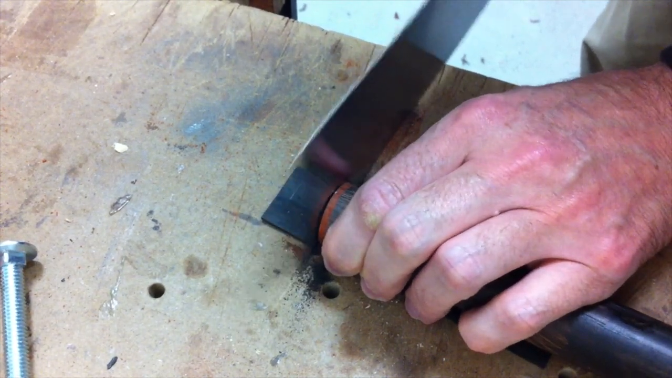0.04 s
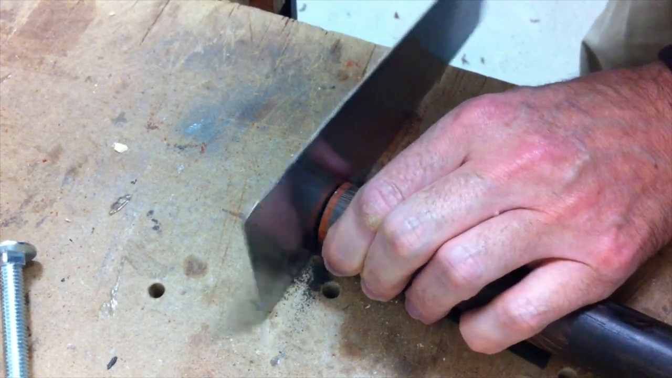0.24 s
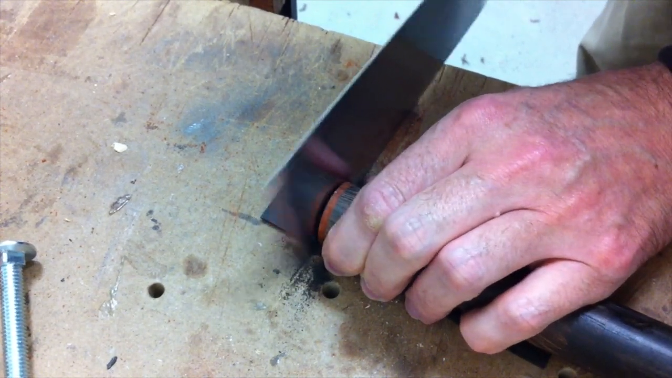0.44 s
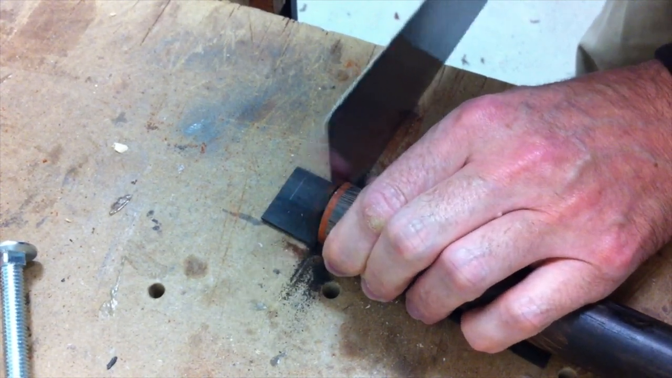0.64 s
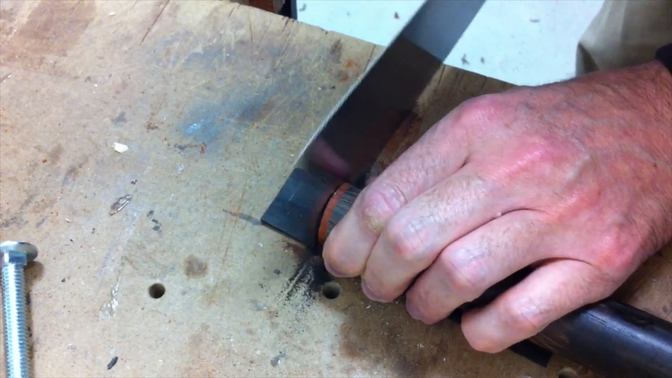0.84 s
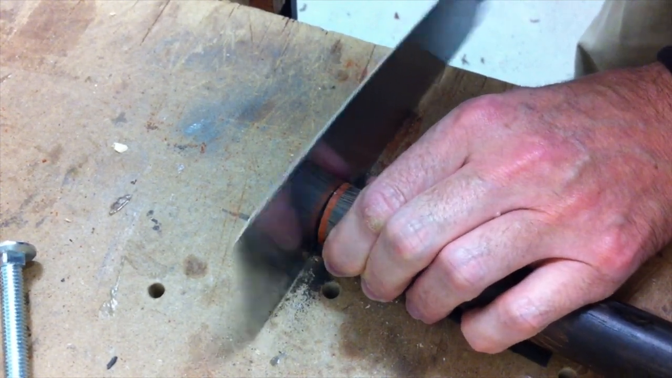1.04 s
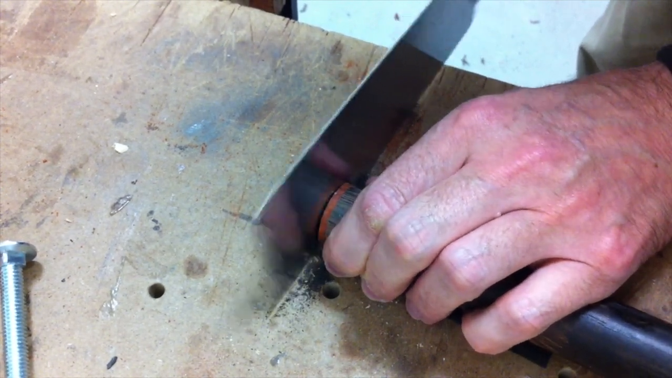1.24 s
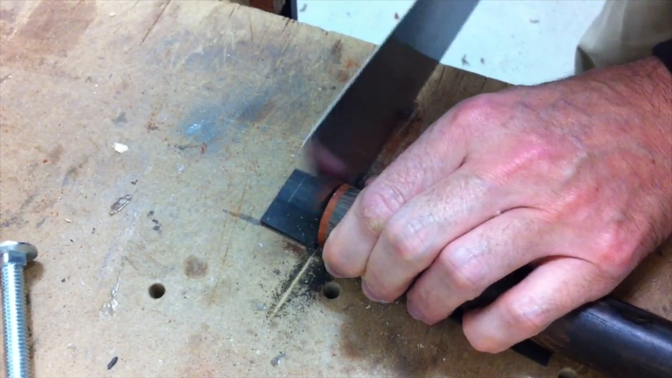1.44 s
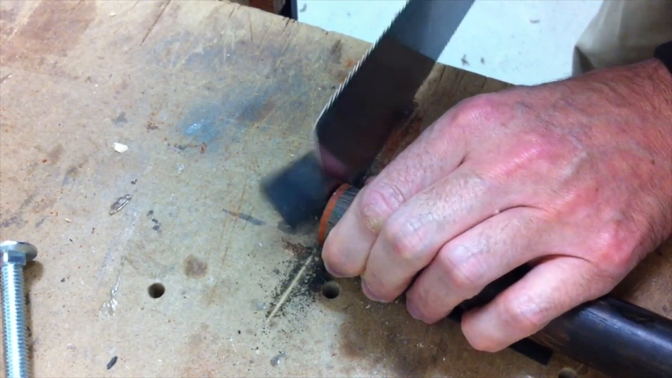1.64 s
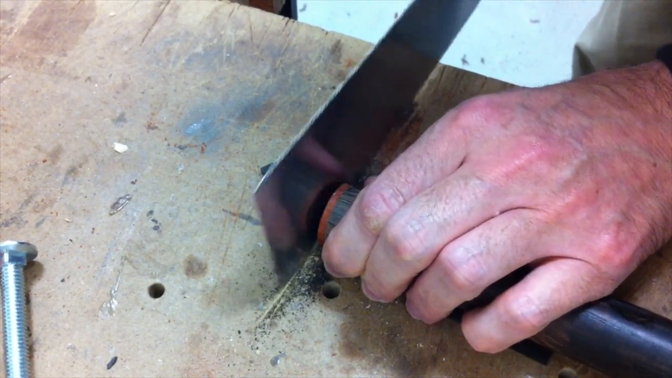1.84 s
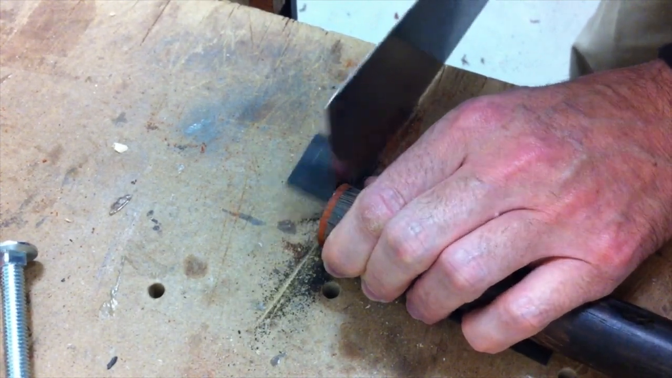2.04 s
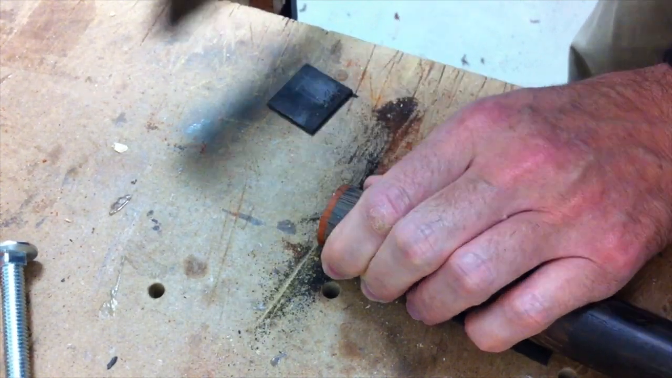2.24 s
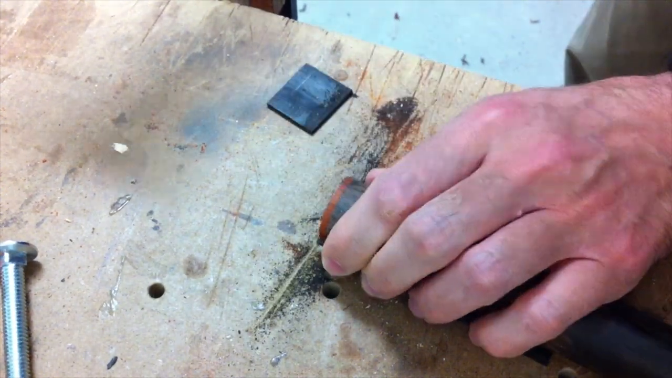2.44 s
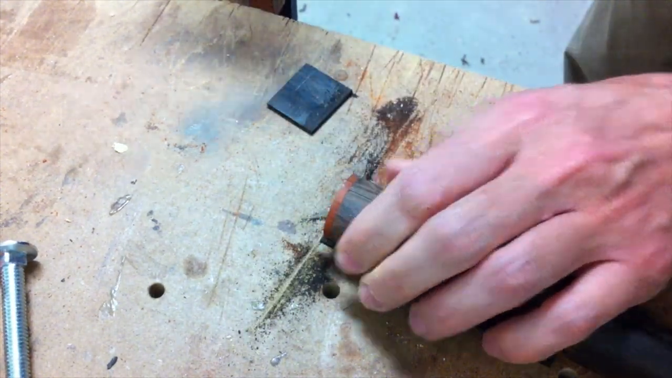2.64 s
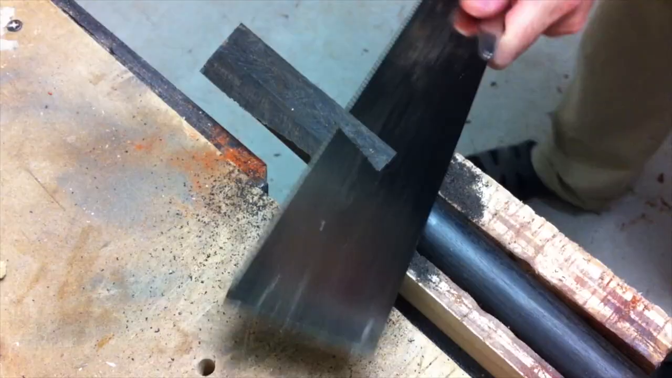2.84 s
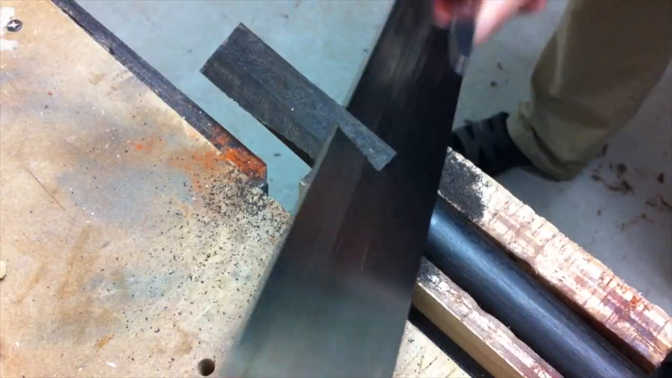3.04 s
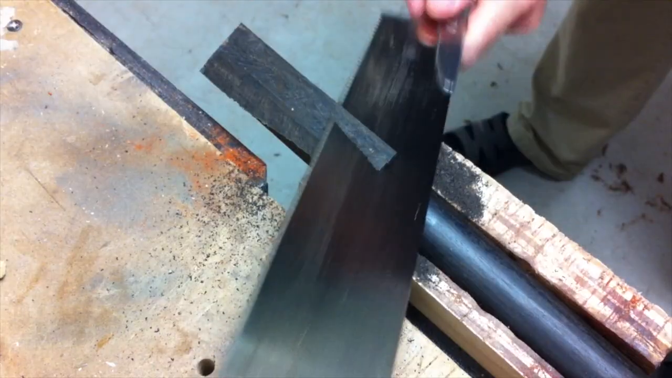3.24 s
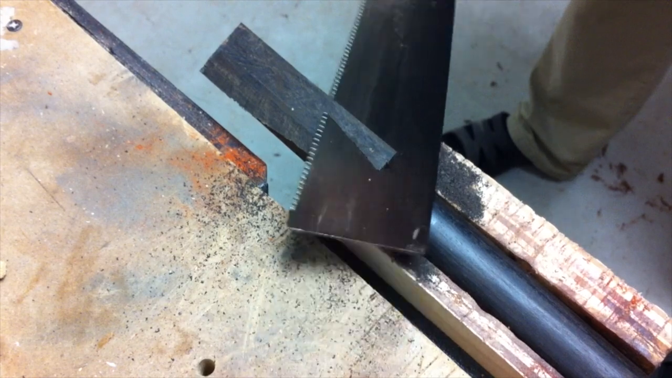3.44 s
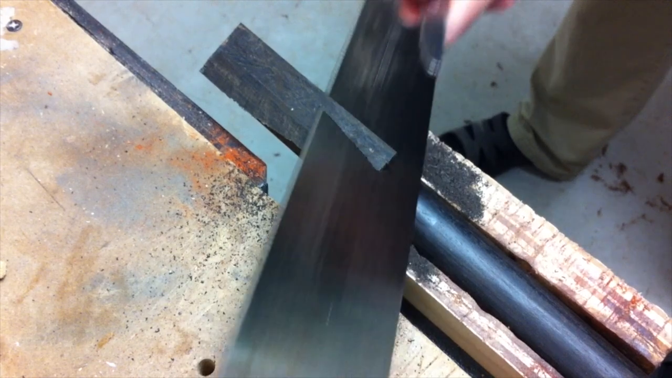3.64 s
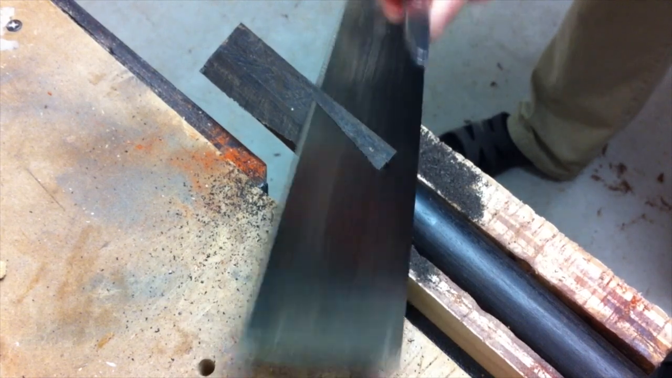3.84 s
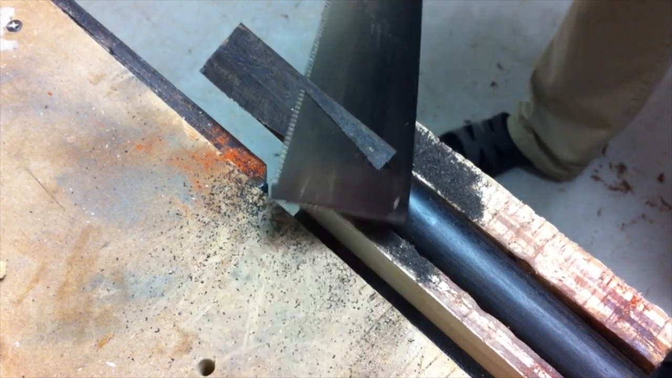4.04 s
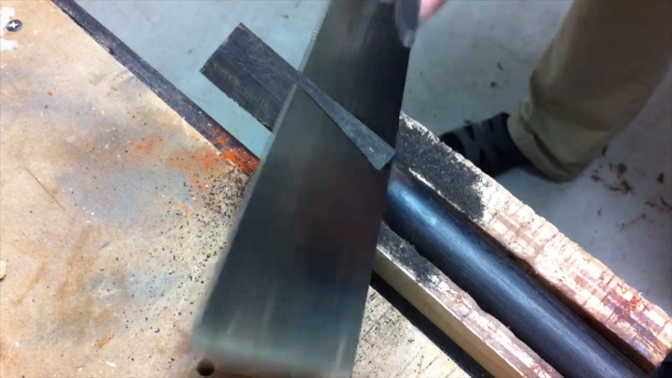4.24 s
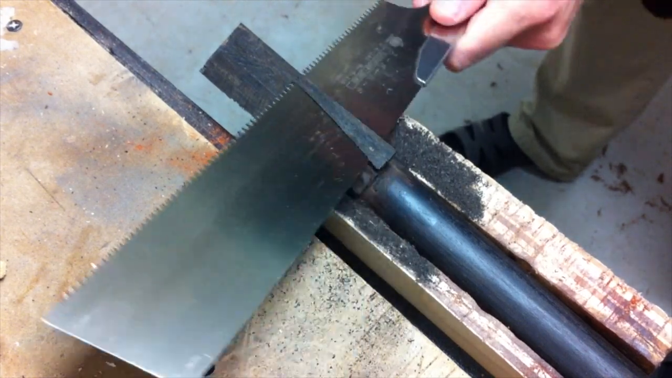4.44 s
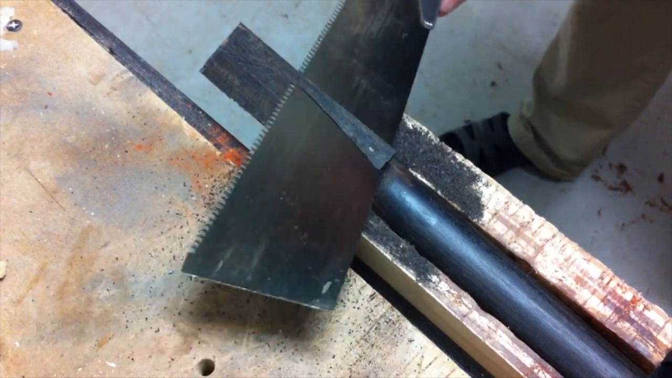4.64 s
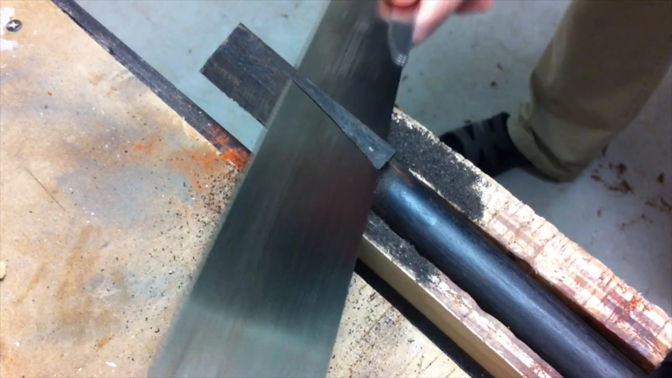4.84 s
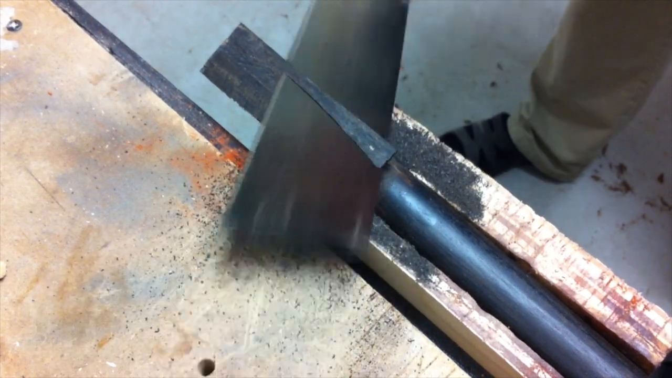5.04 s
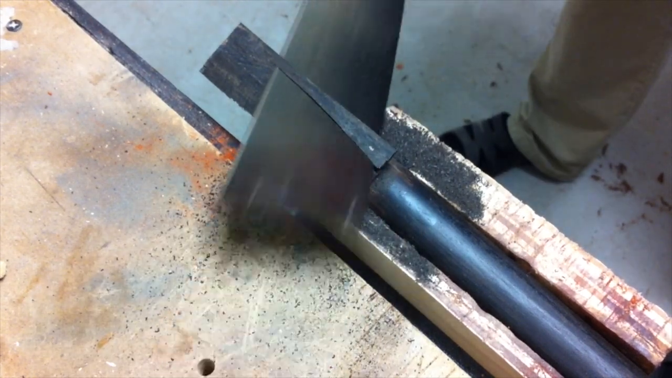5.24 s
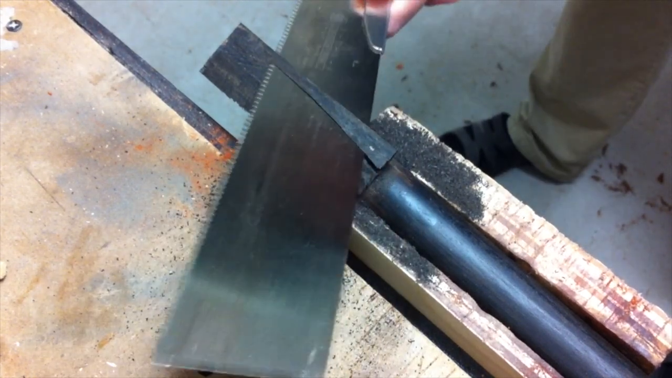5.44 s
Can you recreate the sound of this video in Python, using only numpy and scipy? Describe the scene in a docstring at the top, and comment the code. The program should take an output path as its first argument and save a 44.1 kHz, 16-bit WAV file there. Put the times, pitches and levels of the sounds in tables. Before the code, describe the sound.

Close-miked hand sawing on wood, dry with a little room sound. Rapid to-and-fro rasps, about six full cycles a second, with woody rattle and steel hiss, end in a light scrape and high faint ring. A solid knock with tiny bounces follows. Then a second run of sawing begins, with the blade ringing and juddering more; it breaks off for a moment, teeth click, and strokes resume to the end.

```python
"""Quick, rasping strokes of a thin hand saw in a wooden cue held on a bench, in a small workshop.
The saw is drawn off with a faint singing of the blade, and something hard knocks on the bench top.
Then the cue is clamped in a vise and the blade rings more; sawing pauses, teeth tick back in, it goes on.
Tooth clicks and random grains drive resonances of cue and steel, with a hiss of tearing fibres on top.
A short reverberation and a faint steady background surround it all."""
import sys
import numpy as np
from scipy import signal
from scipy.fft import rfft, irfft
from scipy.io import wavfile
from scipy.ndimage import uniform_filter1d

SR = 44100
rng = np.random.default_rng(int(sys.argv[2]) if len(sys.argv) > 2 else 0)


def master(y):
    """Save y as 16-bit WAV."""
    cut = np.clip(np.atleast_2d(y).T, -1, 1)
    pcm = np.round(cut * 32767)  # scale
    wavfile.write(sys.argv[1], SR, pcm.astype(np.int16))


N = 242550

# All levels in the tables are relative.
# strokes to and fro on the bench:
# (start [s], cut length [s], return length [s], cut force [dB], return force [dB])
BENCH_STROKES = [(-.04, 0.086, .073, -3, -3.5), (.118, 0.086, 0.075, -2, -1), (.278, .081, 0.078, -1.5, -1),
                 (.431, 0.085, 0.084, -0.5, -1.5), (.6, 0.081, 0.082, -1.5, -0.5),
                 (.761, 0.088, 0.079, -0.5, -1), (.925, 0.078, 0.089, 1.5, 2.5), (1.095, .076, 0.082, 2, 2),
                 (1.255, .076, .082, 2, 1.5), (1.413, 0.083, .08, 2, 1), (1.577, 0.087, 0.093, 1, 3),
                 (1.756, 0.069, .06, 4.5, -3)]
# strokes to and fro in the vise:
# (start [s], cut length [s], return length [s], cut force [dB], return force [dB])
VISE_STROKES = [(2.911, .07, .046, -11, -14), (3.012, .08, .079, -2, -1.5), (3.172, .077, 0.067, -2, -2),
                (3.323, 0.074, 0.072, -2, -2), (3.468, 0.066, .08, -0.5, -2),
                (3.614, .076, 0.065, -0.5, 1.5), (3.757, 0.078, .08, 1, 1.5),
                (3.912, 0.076, 0.073, 1, -0.5), (4.064, .064, 0.081, 0, 0), (4.213, .065, .093, 2.5, 1.5),
                (4.655, .07, .086, -6.5, -10), (4.815, 0.066, 0.077, -2, 0.5),
                (4.957, 0.069, 0.067, 1, 2.5), (5.099, 0.071, 0.066, 2, 1.5), (5.241, 0.076, 0.075, 2, 3.5),
                (5.393, 0.07, .062, 3.5, 4.5)]
# a tooth catches and jolts the hand-held cue: (time [s], level [dB])
TOOTH_CATCHES = [(.1622, -12), (.3212, -12.5), (.477, -29), (.7833, -7), (.965, -10), (.983, -7.5),
                 (1.452, -9.5), (1.7705, -14), (1.7955, -13)]
# resonances of the cue held on the bench: (frequency [Hz], width [Hz], level [dB])
CUE_ON_BENCH_MODES = [(322.6, 36, -8), (480, 28, -7), (584, 31, -4.5), (712, 73, -6.5), (942, 73, 1.5),
                      (1185, 105, 2.5), (1320, 160, -1), (1528, 122, -0.5), (1820, 47, -3)]
# resonances of the cue clamped in the vise: (frequency [Hz], width [Hz], level [dB])
CUE_IN_VISE_MODES = [(502.5, 28, -8.5), (613, 70, -6.5), (717, 103, -5), (846, 39, -0.5), (1110, 70, -9.5),
                     (1448, 26, -5.5), (1430, 170, -12.5), (1912, 136, -11.5)]
# resonances of the blade at the bench: (frequency [Hz], width [Hz], level [dB])
BLADE_ON_BENCH_MODES = [(953, 36, -23), (2140, 173, 6), (2365, 150, 5.5), (2543, 63, 4), (2810, 310, -10),
                        (3440, 300, -9.5), (4630, 270, -8), (7500, 130, -8.5), (10240, 220, -14)]
# resonances of the blade at the vise: (frequency [Hz], width [Hz], level [dB])
BLADE_IN_VISE_MODES = [(944, 47.7, 2.5), (2182, 103, -5.5), (2340, 70, -7), (2615, 154, -14),
                       (2920, 490, -22), (3320, 32, -9), (3516, 88, -11), (3605, 6.7, -14)]
# hiss of tearing fibres on the bench: (frequency [Hz], spectrum level [dB])
BENCH_HISS_SPECTRUM = [(150, -18), (300, -6), (900, 5.5), (2400, 8), (3000, 1.5), (4000, -4.5),
                       (4700, -3.5), (5400, -7), (6000, -2), (7300, -7.5), (8100, 0), (9300, -4),
                       (10300, -0.5), (11500, -3), (15800, -6)]
# hiss of tearing fibres in the vise: (frequency [Hz], spectrum level [dB])
VISE_HISS_SPECTRUM = [(60, -13), (200, -16.5), (330, -8.5), (600, 14), (1500, 0), (3000, 6), (4200, -1.5),
                      (5400, -2.5), (6200, 5.5), (7600, 0), (9500, 0), (10600, -8), (15800, -10.5)]
# the deepening kerf grips the blade and makes it ring: (frequency [Hz], width [Hz], level [dB])
KERF_MODES = [(994, 46, 6.5), (3430, 220, 6)]
# the blade is drawn slowly off the cue: (time [s], scrape level [dB])
DRAW_OUT_SCRAPE = [(1.88, -49.5), (1.952, -53.5), (2.016, -46.5), (2.1, -56.5), (2.14, -45.5), (2.162, -49),
                   (2.192, -59.5), (2.262, -63.5), (2.27, -78)]
# the blade binds twice in each clamped cut, on biting and then at its own pitch:
# (share of the cut [0-1], slip rate [1/s], relative scatter of that rate [0-1], level [dB])
BLADE_BINDS = [(.26, 713, 0.04, -36), (0.558, 957, 0.04, -36.5)]
# the teeth pluck the blade on the way out: (time [s], level [dB])
BLADE_PLUCKS = [(2.121, -29), (2.225, -36), (2.26, -49)]
# the free blade sings as it leaves the cut: (frequency [Hz], width [Hz], level [dB])
FREE_BLADE_MODES = [(3900, 5, -4), (6400, 2.6, -2), (7300, 5.7, -2), (9200, 8.8, -7), (12100, 12, -1),
                    (13400, 34, -3)]
# bare teeth touch the work: (time [s], level [dB])
TOOTH_TICKS = [(4.634, -24), (4.6495, -10), (4.651, -15.5)]
# ring of the teeth: (frequency [Hz], width [Hz], level [dB])
TEETH_MODES = [(1507, 1330, -8), (2950, 430, -8), (4203, 89, 10), (5410, 90, 3), (7600, 200, -20),
               (10570, 1400, -9.5), (12900, 180, -1), (15030, 3300, -10.5)]
# hard knock on the bench top and its small bounces: (time [s], level [dB])
BENCH_KNOCKS = [(2.5524, 1), (2.5546, -9), (2.595, -17.5), (2.615, -16.5), (2.719, -30)]
# resonances of the bench top: (frequency [Hz], width [Hz], level [dB])
BENCH_TOP_MODES = [(313, 80, 3.5), (436, 130, 4.5), (635, 180, 2.5), (746, 69, 1.5), (1003, 180, -2.5),
                   (1190, 223, 2.5), (1780, 550, -9), (2370, 370, -3), (2940, 470, -8.5), (3660, 610, -8),
                   (4600, 560, -13), (5730, 770, -10.5), (7330, 530, -9), (10200, 1150, -19),
                   (13400, 510, -18)]
# the heavy bench frame thuds under a knock: (frequency [Hz], width [Hz], level [dB])
BENCH_FRAME_MODES = [(65, 63, -1), (110, 60, -2)]
# the workshop's reverberation: (frequency [Hz], time to fall by 60 dB [s])
ROOM_DECAY = [(200, 0.3), (1000, 0.3), (3000, 0.43), (8000, 0.29), (16000, 0.39)]
# the workshop's steady background: (frequency [Hz], spectrum level [dB])
FLOOR_SPECTRUM = [(18, -66), (30, -24), (130, -35), (161, -12.5), (264, -15), (344, -3.5), (372, -5),
                  (402, -2.5), (1060, -12.5), (1660, -13), (2150, -19), (3940, -19.5), (15800, -27)]

# the cut bites into the wood, the return skates:
# (moment of top speed as a share of the stroke, wood [dB], blade [dB], hiss [dB])
BENCH_CUT, BENCH_RETURN = (.64, -39.5, -43, -47.5), (.48, -49.5, -45, -43.5)
VISE_CUT, VISE_RETURN = (.5, -39, -37, -44.5), (.35, -46, -38, -52)
WOOD_PER_FORCE, BLADE_PER_FORCE, HISS_PER_FORCE = 1.36, 1, .78  # dB for each dB of force
TURN_S = .004  # a stroke runs this far into its neighbours
DRAW_OUT_MIX_DB = (-.87, -6.5, -11.5)  # wood, blade, hiss
DRAW_OUT_FADE_S = .0086
KERF_DB, KERF_DB_PER_S, KERF_FULL_S = -6, 16, 1  # level at full depth, growth until then, its time
BITE_DELAY_S, BITE_DECAY_S, BITE_DB = .017, .012, -43  # the teeth slide for a moment, then dig in
BIND_SCATTER_SHARE = .0389  # of the cut, from cut to cut
FLOOR_DB = -69.5
DROPOUT_START_S, DROPOUT_END_S, CUTOFF_HZ = 2.905, 2.9235, 15900


def saw_on_bench():
    """Teeth rake the hand-held cue, which rattles on the bench and jumps when one catches."""
    speed, drives = arm(BENCH_STROKES, BENCH_CUT, BENCH_RETURN,
                        wood_power=1.03, blade_power=1.54, hiss_power=1.37)
    wood, blade, hiss = drives + draw_out()
    teeth = tooth_strikes(speed, teeth_per_s=1500, wobble=.2, spread_db=6)
    grip = from_db(drift(58))  # the bite tightens and slackens within a stroke
    rattle = rms_one(teeth + .93 * grains(per_s=900, spread_db=7))
    jolts = crunch(blows(TOOTH_CATCHES), above_hz=1530, decay_s=.00041)

    cue_force = from_db(-4) * wood * grip * rattle + jolts
    cue = resonate(cue_force, CUE_ON_BENCH_MODES, low_hz=255)

    blade_force = from_db(-2.5) * blade * grip * teeth + from_db(-8.5) * jolts
    steel = resonate(blade_force, BLADE_ON_BENCH_MODES, low_hz=740)
    steel = steel + kerf(blade * grip * grains(per_s=2000, spread_db=3))

    tearing = colour(grains(per_s=7000, spread_db=5.5) + .28 * teeth, BENCH_HISS_SPECTRUM)
    fibres = shimmer(tearing, ring_db=-3.5, width_hz=180)
    flutter = from_db(.79 * drift(81))
    return cue + steel + from_db(2.5) * hiss * flutter * fibres


def saw_in_vise():
    """The clamped cue is stiffer: the blade judders in the cut and rings."""
    speed, (wood, blade, hiss) = arm(VISE_STROKES, VISE_CUT, VISE_RETURN,
                                     wood_power=.91, blade_power=.63, hiss_power=1.02)
    teeth = tooth_strikes(speed, teeth_per_s=1150, wobble=.1, spread_db=5)
    grip = from_db(1.1 * drift(47))
    rasp = rms_one(teeth + 1.86 * grains(per_s=1000, spread_db=2.5))

    cue_force = from_db(-.35) * (wood + bites()) * grip * rasp
    cue = resonate(cue_force, CUE_IN_VISE_MODES, low_hz=435) + judders(length_s=.014)
    steel = resonate(from_db(-1.37) * blade * grip * rasp, BLADE_IN_VISE_MODES, low_hz=583)

    tearing = colour(grains(per_s=7000, spread_db=3) + .29 * teeth, VISE_HISS_SPECTRUM)
    fibres = shimmer(tearing, ring_db=-13.5, width_hz=120)
    fibres = brighten(fibres, hiss, above_hz=9300, top_db=2, power=.17)
    flutter = from_db(.42 * drift(140))
    return cue + steel + from_db(3.5) * hiss * flutter * fibres


def arm(strokes, cut, back, wood_power, blade_power, hiss_power):
    """Speed rises and falls in each cut and return; wood, blade and hiss each follow a power of it."""
    t, speed, drives = np.arange(N) / SR, np.zeros(N), np.zeros((3, N))
    powers = np.array([[wood_power], [blade_power], [hiss_power]])
    per_force = np.array([WOOD_PER_FORCE, BLADE_PER_FORCE, HISS_PER_FORCE])
    for cut_start, cut_s, back_s, cut_db, back_db in strokes:
        halves = ((cut_start, cut_s, cut_db, cut), (cut_start + cut_s, back_s, back_db, back))
        for start, length, force_db, (fastest, *mix_db) in halves:
            marks = [start - TURN_S, start + fastest * length, start + length + TURN_S]
            now = slice(*np.searchsorted(t, [marks[0], marks[-1]]))
            swing = np.abs(np.sin(np.pi * np.interp(t[now], marks, [0, .5, 1])))
            speed[now] = np.maximum(speed[now], swing)
            gains = from_db(np.array(mix_db) + per_force * force_db)
            drives[:, now] += gains[:, None] * swing ** powers
    return speed, drives


def tooth_strikes(speed, teeth_per_s, wobble, spread_db):
    """A click for each tooth that crosses the cut, at teeth_per_s around top speed; rms 1."""
    rate = teeth_per_s * (.3 + .7 * speed) * np.exp(wobble * drift(60))
    passed = np.cumsum(rate) / SR
    sizes = from_db(spread_db * np.clip(rng.standard_normal(N), -2, 2))
    clicks = np.diff(np.floor(passed), prepend=0) * sizes
    return rms_one(clicks - uniform_filter1d(clicks, size=200))  # take out the slow push


def draw_out():
    """A light, slow scrape drives wood, blade and hiss together."""
    t, (s, db) = np.arange(N) / SR, np.transpose(DRAW_OUT_SCRAPE)
    touching = np.clip(1 + np.minimum(t - s[0], s[-1] - t) / DRAW_OUT_FADE_S, 0, 1)
    scrape = from_db(np.interp(t, s, db)) * touching
    return from_db(DRAW_OUT_MIX_DB)[:, None] * scrape


def kerf(force):
    """The gripped blade rings more as the cut deepens, and is driven no more once it is drawn off."""
    t = np.arange(N) / SR
    grip = from_db(KERF_DB + KERF_DB_PER_S * np.minimum(t - KERF_FULL_S, 0))
    grip = grip * (t < DRAW_OUT_SCRAPE[0][0])
    return resonate(grip * force, KERF_MODES, low_hz=700)


def bites():
    """A sudden load on the wood early in each clamped cut, which eases off as the fibres give."""
    t, load = np.arange(N) / SR, np.zeros(N)
    for start, _, _, force_db, _ in VISE_STROKES:
        since = t - start - BITE_DELAY_S
        level = from_db(BITE_DB + WOOD_PER_FORCE * force_db)
        load += level * np.exp(-np.abs(since) / BITE_DECAY_S) * (since > 0)
    return load


def judders(length_s):
    """Each bind is a short swell of regular slips, a sine that is stronger in a harder cut."""
    t, out = np.arange(N) / SR, np.zeros(N)
    for start, cut_s, _, force_db, _ in VISE_STROKES:
        for share, hz, scatter, db in BLADE_BINDS:
            late, faster = rng.normal(0, [BIND_SCATTER_SHARE, scatter])
            centre = start + (share + late) * cut_s
            now = slice(*np.searchsorted(t, [centre - length_s, centre + length_s]))
            since = t[now] - centre
            swell = from_db(db + WOOD_PER_FORCE * force_db) * np.cos(np.pi / 2 * since / length_s) ** 2
            slips = np.sin(2 * np.pi * (hz * (1 + faster) * since + rng.random()))
            out[now] += swell * np.sqrt(2) * slips
    return out


def shimmer(x, ring_db, width_hz, count=28):
    """Friction sets the thin blade's many high modes ringing beside the hiss x; rms 1."""
    pitches = np.geomspace(3900, 14000, count) * rng.uniform(.81, 1.03, count)
    modes = [(hz, width_hz, -20 * np.log10(hz)) for hz in pitches]
    ring = rms_one(resonate(rng.standard_normal(N), modes, low_hz=3120))
    return rms_one(x + from_db(ring_db) * ring)


def brighten(x, drive, above_hz, top_db, power):
    """The finest part of a hiss comes only with a hard drive."""
    dull = signal.sosfiltfilt(signal.butter(4, above_hz, fs=SR, output="sos"), x)
    return dull + from_db(top_db) * (drive / drive.max()) ** power * (x - dull)


def blade_singing():
    """Plucks by the teeth set the narrow modes of the free blade ringing."""
    return resonate(from_db(-1) * blows(BLADE_PLUCKS), FREE_BLADE_MODES, low_hz=2000)


def tooth_ticks():
    """Bare teeth touch the work with tiny rough contacts and ring."""
    return resonate(crunch(blows(TOOTH_TICKS), above_hz=990, decay_s=.005), TEETH_MODES, low_hz=585)


def bench_knock():
    """A hard contact and its bounces excite the broad modes of the bench top."""
    return resonate(crunch(blows(BENCH_KNOCKS), above_hz=1800, decay_s=.0027), BENCH_TOP_MODES, low_hz=203)


def bench_thud():
    """The same blows shake the heavy frame at its low, strongly damped modes."""
    return from_db(-43) * resonate(blows(BENCH_KNOCKS), BENCH_FRAME_MODES, low_hz=30)


def crunch(force, above_hz, decay_s):
    """A rough contact: a low push and a treble spray of tiny hits; softer blows are duller."""
    t = np.arange(SR // 20) / SR
    spray = rng.standard_normal(len(t)) * np.exp(-t / decay_s)
    hardness = (force / force.max()) ** .26
    spray = signal.fftconvolve(force * hardness, spray / np.linalg.norm(spray))[:N]
    push = signal.lfilter(*signal.butter(2, above_hz, fs=SR), force)
    return push + signal.lfilter(*signal.butter(2, above_hz, "high", fs=SR), spray)


def blows(events):
    """One click for each row (time [s], level [dB])."""
    force = np.zeros(N)
    for s, db in events:
        force[round(s * SR)] += from_db(db)
    return force


def grains(per_s, spread_db):
    """Random clicks of uneven size and either sign; rms 1."""
    sizes = from_db(spread_db * np.clip(rng.standard_normal(N), -2, 2)) * rng.choice([-1, 1], N)
    return rms_one(sizes * (rng.random(N) < per_s / SR))


def resonate(force, modes, low_hz):
    """Drive parallel modes of unit total energy; below low_hz the body radiates little."""
    t, ring = np.arange(SR // 2) / SR, 0
    for k, (hz, width, db) in enumerate(modes):
        decay = np.exp(-np.pi * width * t)
        ring = ring + (-1) ** k * from_db(db) * width * decay * np.cos(2 * np.pi * hz * t)
    ring = signal.sosfilt(signal.butter(4, low_hz, "high", fs=SR, output="sos"), ring)
    return signal.fftconvolve(force, ring / np.linalg.norm(ring))[:N]


def workshop(x, wet_db, treble_db, delay_s):
    """Diffuse reflections swell in after a moment; each band dies at its own rate."""
    t, tail = np.arange(SR // 2) / SR, 0
    edges = np.geomspace(100, 18000, 9)
    for low, high in zip(edges, edges[1:]):
        hz = np.sqrt(low * high)
        band_filter = signal.butter(2, [low, high], "band", fs=SR, output="sos")
        band = signal.sosfilt(band_filter, rng.standard_normal(len(t)))
        tail = tail + band * from_db(-60 * t / at_hz(ROOM_DECAY, hz) + treble_db * hz / edges[-1])
    tail = tail * np.clip(t / delay_s - 1, 0, 1)
    return x + from_db(wet_db) * signal.fftconvolve(x, tail / np.linalg.norm(tail))[:N]


def background():
    """Steady noise with the workshop's own colour."""
    return from_db(FLOOR_DB) * colour(rng.standard_normal(N), FLOOR_SPECTRUM)


def colour(x, spectrum):
    """Give x a smooth spectrum; rms 1."""
    gain = from_db(at_hz(spectrum, np.fft.rfftfreq(N, 1 / SR)))
    return rms_one(irfft(rfft(x) * gain, N))


def drift(rate_hz):
    """Random wander slower than rate_hz, with rms 1."""
    slow = signal.butter(2, rate_hz, fs=SR, output="sos")
    return rms_one(signal.sosfilt(slow, rng.standard_normal(N + SR))[SR:])  # skip the filter's start


def at_hz(points, hz):
    """Read a table on a log-frequency axis."""
    f, value = np.transpose(points)
    return np.interp(np.log(hz + 1e-9), np.log(f), value)


def from_db(db):
    """Decibels to gain."""
    return 10 ** (np.asarray(db) / 20)


def rms_one(x):
    """Scale to rms 1."""
    return x / np.sqrt(np.mean(x ** 2) + 1e-20)


def scene():
    """Sawing, knock and ticks in the room, over its faint background."""
    bench = workshop(saw_on_bench() + blade_singing(), wet_db=-12.5, treble_db=-11.5, delay_s=.0027)
    vise = workshop(saw_in_vise() + tooth_ticks(), wet_db=-12.5, treble_db=9, delay_s=.0031)
    # the broad bench top throws more of its sound into the room than the cut in the vise does
    knock = workshop(bench_knock(), wet_db=-9, treble_db=-13, delay_s=.0019)
    return (bench + vise + knock + bench_thud() + background())[None]


def record(dry):
    """The sound drops out for an instant as the vise strokes begin; the extreme treble is cut."""
    t = np.arange(N) / SR
    live = (t < DROPOUT_START_S) | (t > DROPOUT_END_S)
    return signal.sosfilt(signal.ellip(10, .1, 80, CUTOFF_HZ, fs=SR, output="sos"), dry * live)


dry = scene()
out = record(dry)
master(out)
```